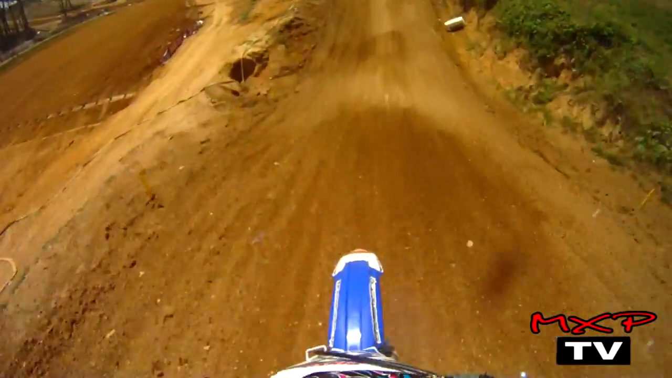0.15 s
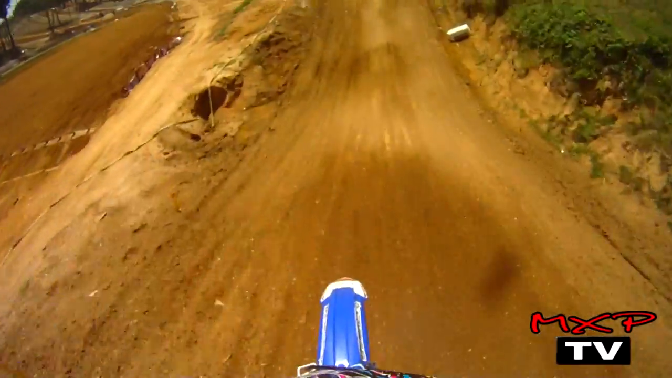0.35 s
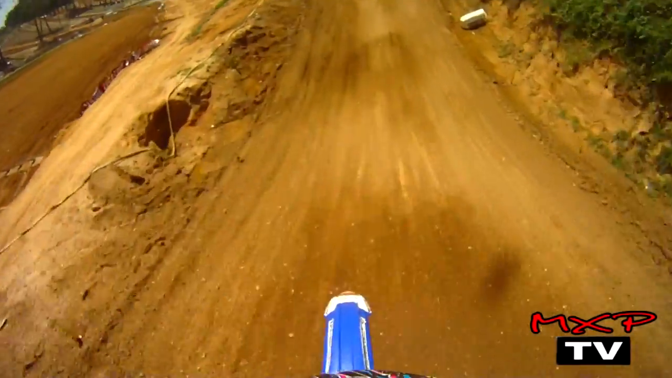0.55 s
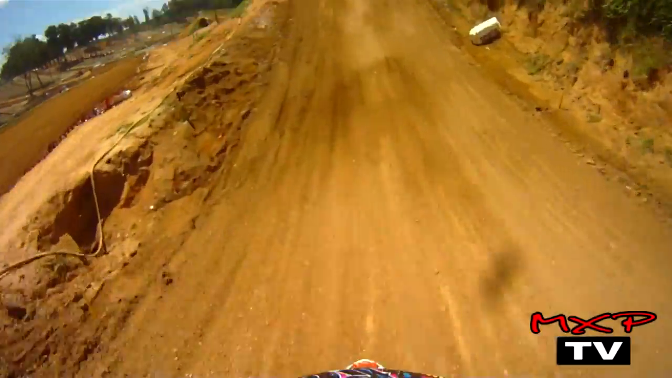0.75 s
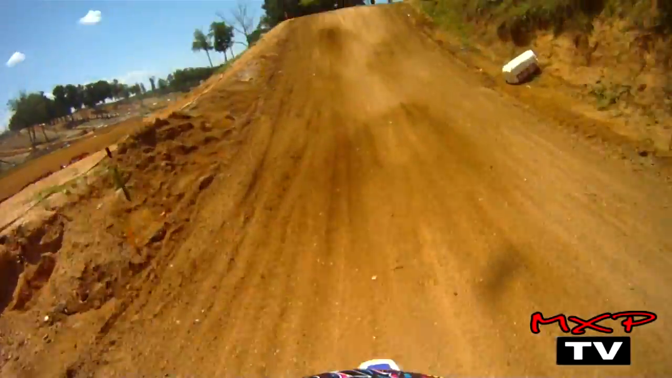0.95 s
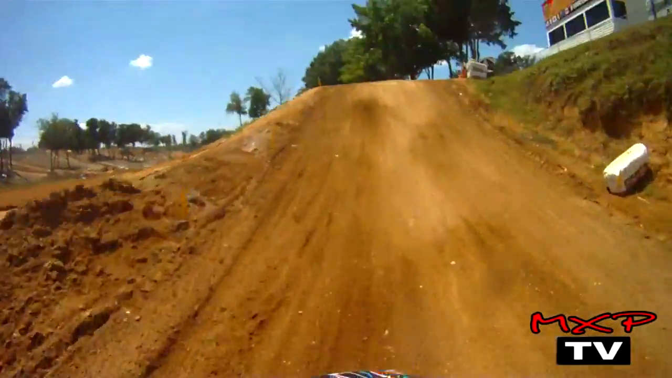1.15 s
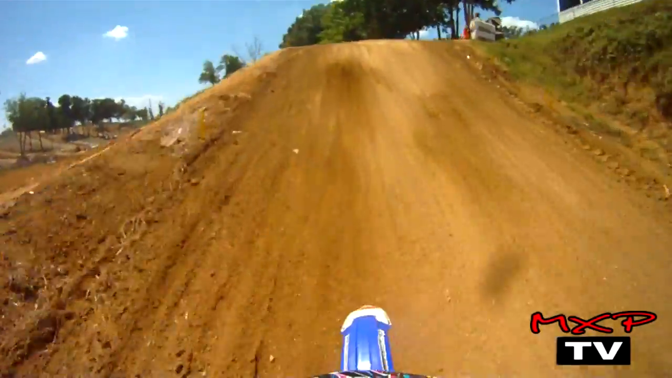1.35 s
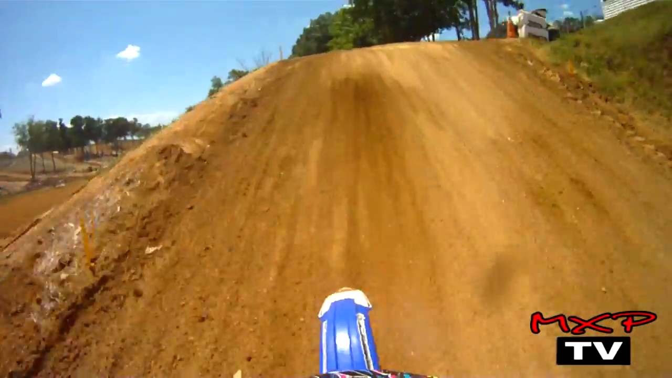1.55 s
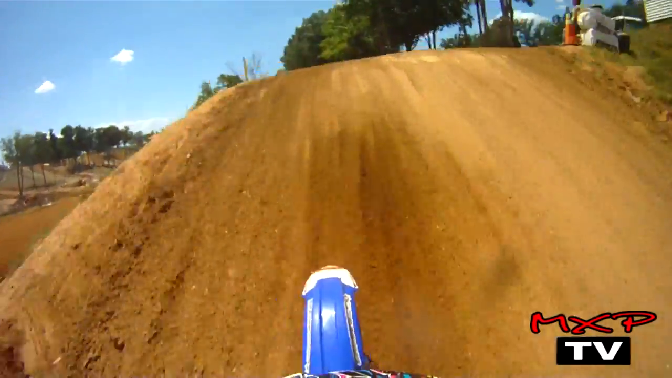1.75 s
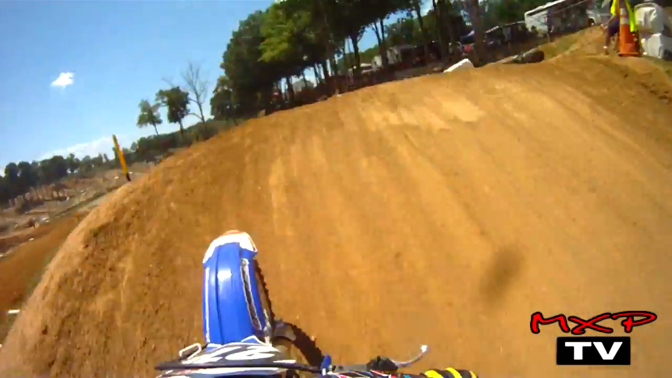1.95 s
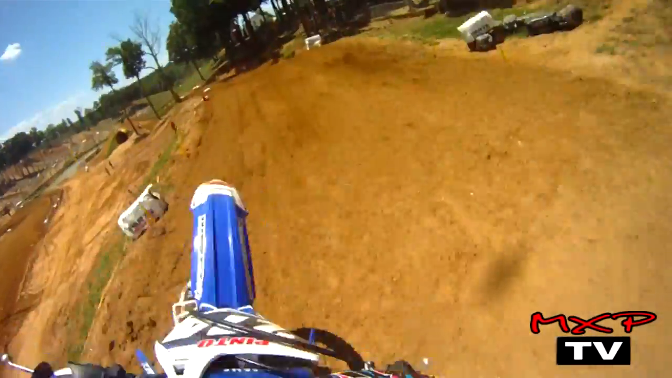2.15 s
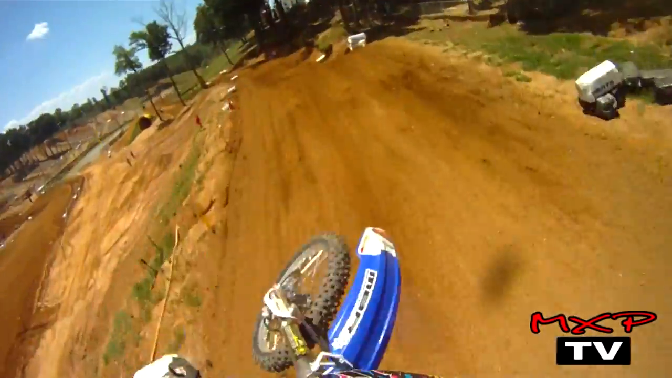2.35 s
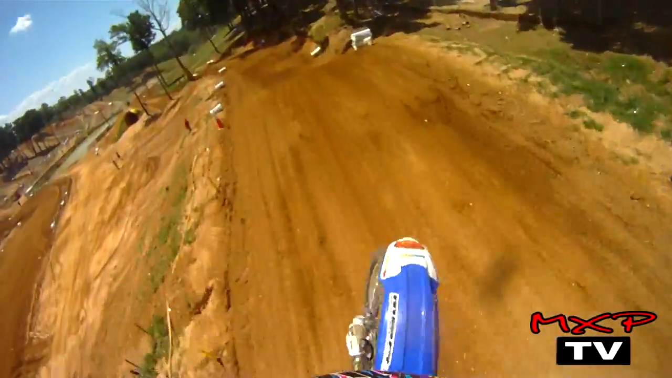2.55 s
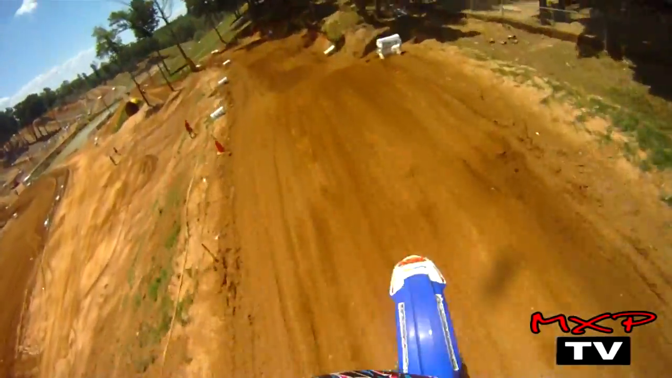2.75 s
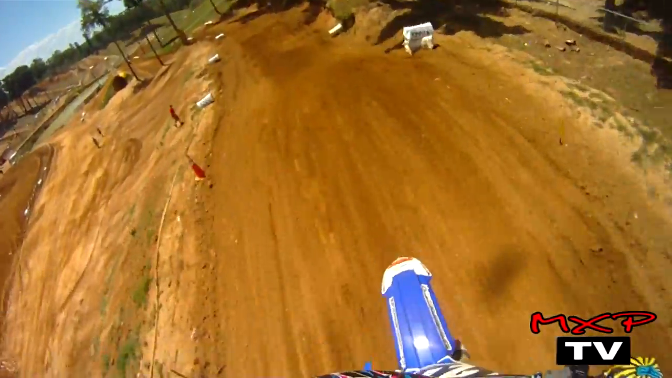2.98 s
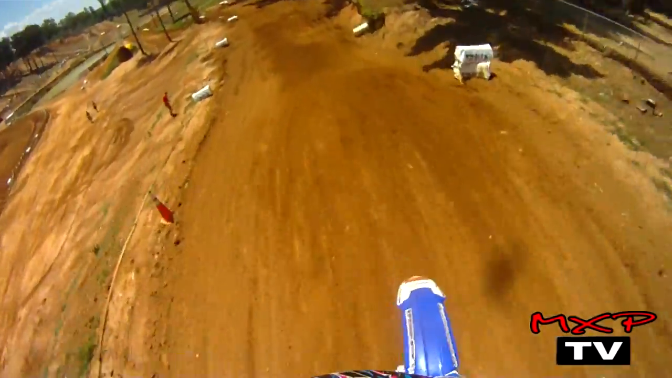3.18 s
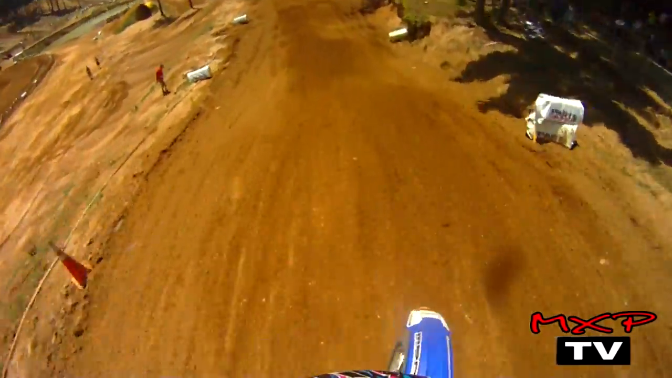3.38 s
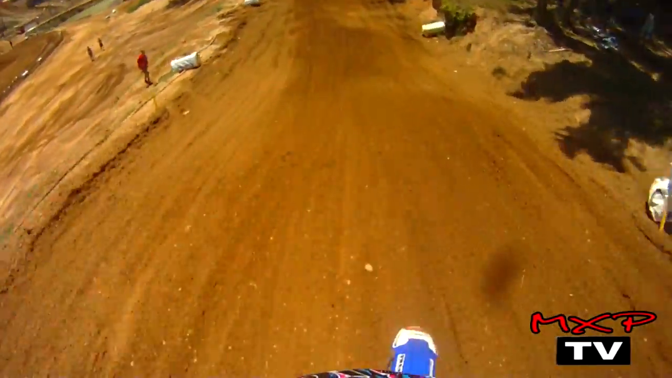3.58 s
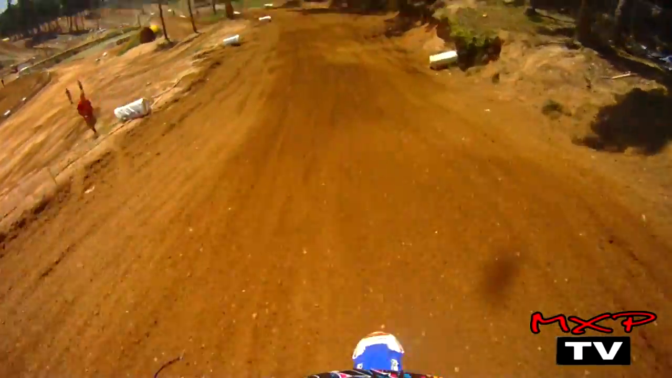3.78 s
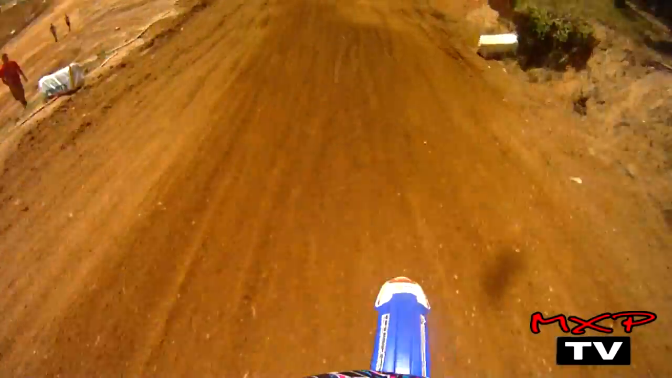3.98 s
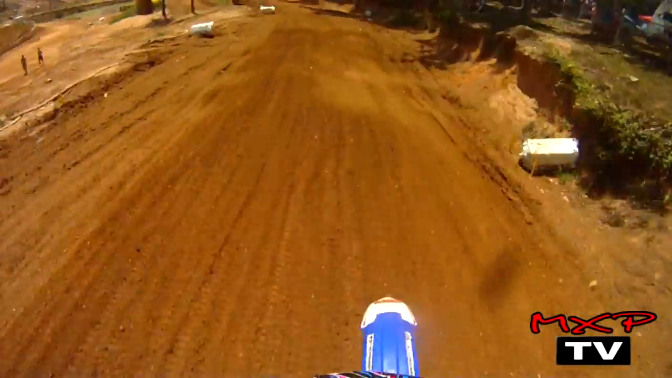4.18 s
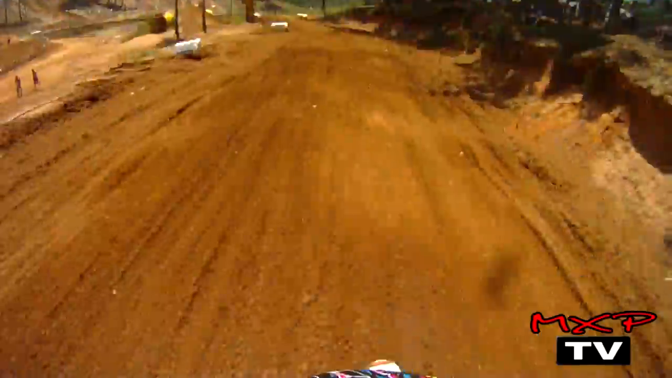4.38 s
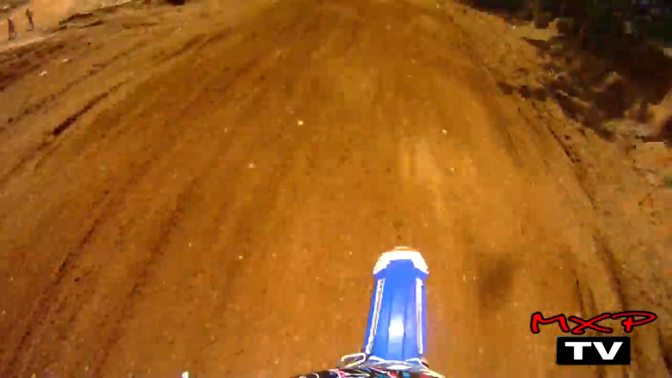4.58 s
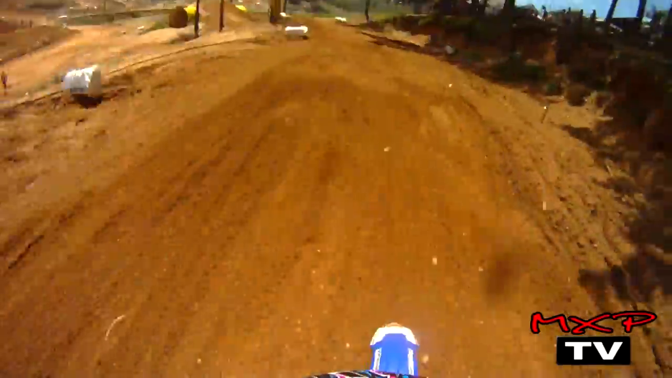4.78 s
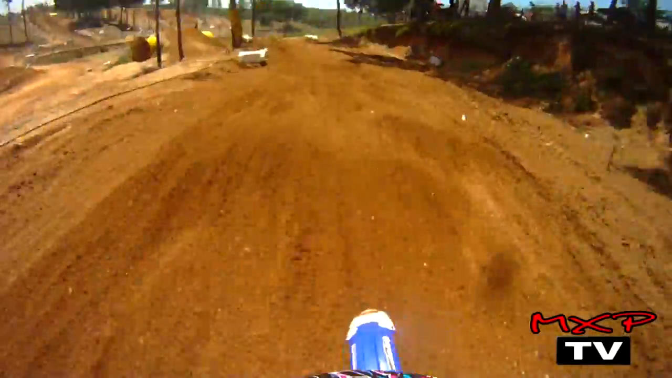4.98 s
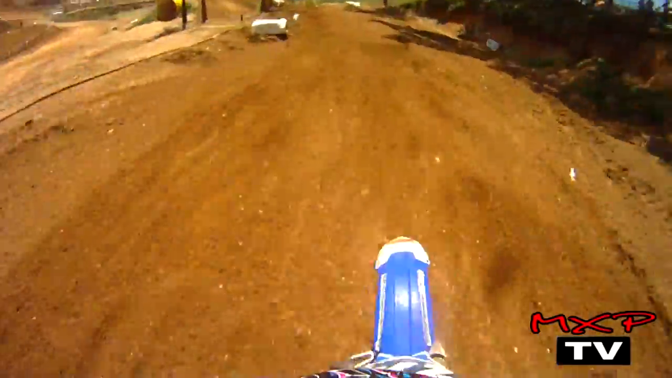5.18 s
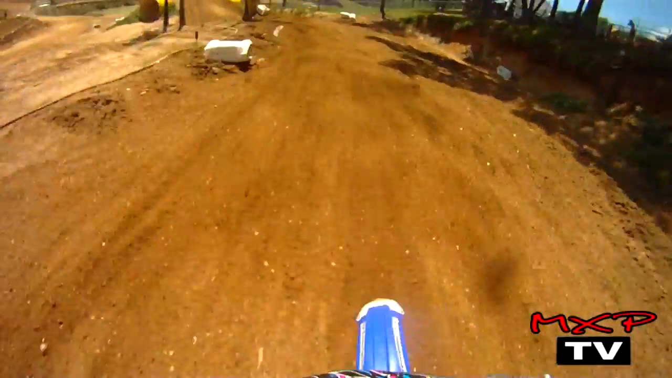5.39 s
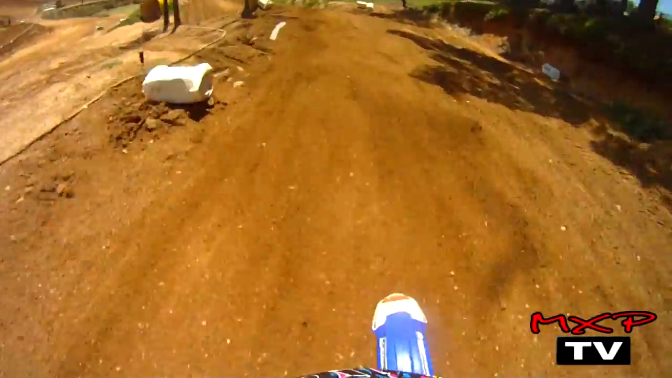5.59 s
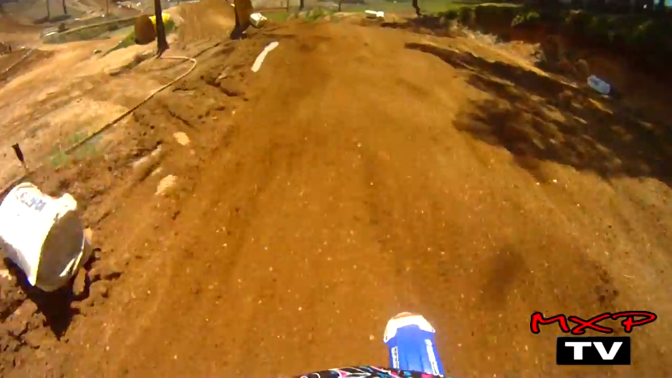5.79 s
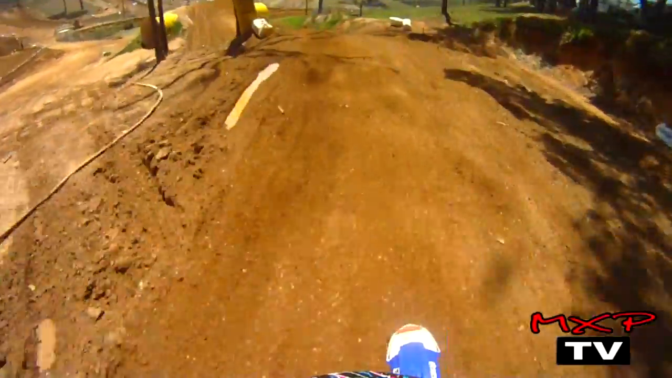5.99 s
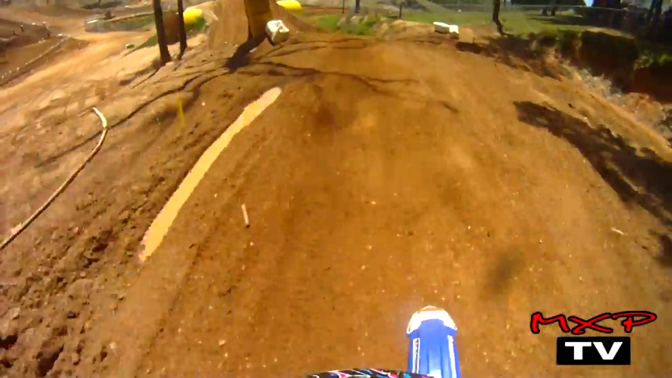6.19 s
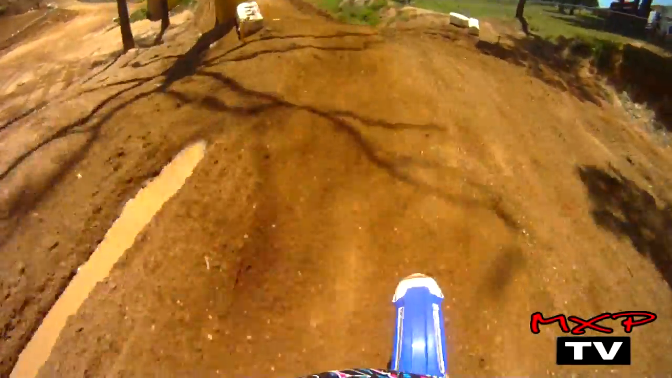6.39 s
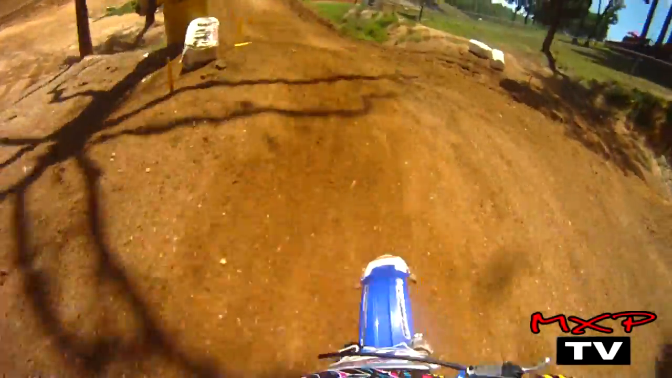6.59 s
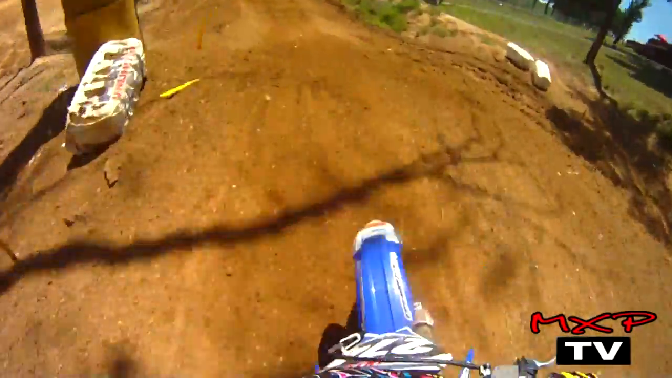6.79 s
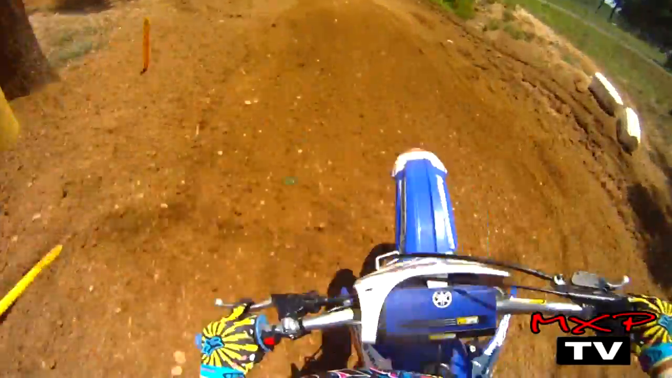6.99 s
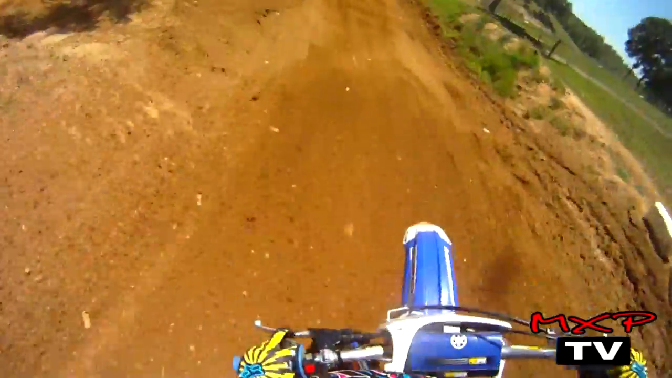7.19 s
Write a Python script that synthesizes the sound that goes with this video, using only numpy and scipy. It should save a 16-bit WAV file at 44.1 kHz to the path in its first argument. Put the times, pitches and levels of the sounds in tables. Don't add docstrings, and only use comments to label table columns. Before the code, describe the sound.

A two-stroke dirt bike is heard from the rider's helmet, close, mono, dry and gritty. It burbles quietly until 0.5 s, then leaps into a loud, metallic, ringing wail held to about 2.2 s, with low wind thumps near 1 s. A light touchdown knocks at 2.15 s; the throttle closes and the note sinks, softer and hollow, until 3.4 s. A rising burst ends in a heavy thud and clack at 3.8 s, the sound briefly ducking. The engine pulls hard again, wavering roughly to 4.6 s, when a sharp backfire cracks. Lower, uneven sputter follows, with a flare around 4.9 s and gusty rumbling. A second bang hits at 5.8 s, a quick rev flare follows, and the loudest, longest bang comes at 6.4 s, muffling everything momentarily. The engine then coasts, low and smoother, with small blips to the end at about 7 s.

```python
import sys
import numpy as np
from scipy import signal
from scipy.fft import rfft, irfft, next_fast_len
from scipy.io import wavfile
from scipy.ndimage import uniform_filter1d

SR = 44100
rng = np.random.default_rng(int(sys.argv[2]) if len(sys.argv) > 2 else 0)


def dump(signal):
    limited = np.clip(np.atleast_2d(signal).T, -1, 1)
    pcm = np.round(limited * 32767).astype(np.int16)
    wavfile.write(sys.argv[1], SR, pcm)


def voltage_ratio(decibels):
    exponent = np.asarray(decibels, float) / 20
    return 10 ** exponent


N = 319284
T = np.arange(N) / SR
FAST, RATE = T[::3], SR / 3
SLOW = T[::64]

# (frequency [Hz], width [Hz], level [dB])
BOX_ROCKING = [(31.1, 11.8, 16), (49.7, 43, -29)]
# (frequency [Hz], width [Hz], level [dB])
AIR_RUSH = [(73, 230, 12), (298, 1800, -25)]
# (time [s], half length [s], level [dB])
GUSTS = [(0.0, 0.11, -39), (.25, .15, -47), (0.892, .06, -27.5), (1.01, 0.076, -17.5), (1.384, .09, -32),
         (1.618, 0.16, -45), (1.8, .2, -45), (2.1, .3, -38), (2.457, .1, -36), (2.66, .06, -34),
         (2.822, 0.21, -39), (3.071, .12, -38), (3.34, 0.083, -33), (3.56, .13, -36), (3.831, .07, -19.5),
         (4.127, 0.11, -27), (4.44, 0.095, -27), (4.56, .15, -24), (4.69, .08, -24), (5.08, 0.15, -25),
         (5.259, 0.055, -21), (5.401, .2, -24.5), (5.867, .05, -29), (6.063, 0.16, -23),
         (6.271, 0.061, -35), (6.382, .12, -23), (6.444, 0.032, -35), (6.629, 0.065, -35),
         (6.79, 0.21, -23.5), (7.14, .1, -39)]
# (time [s], jolt [dB], shake level [dB], shake frequency [Hz], shake t60 [s])
LANDINGS = [
    (2.151, -20, -32, 60, 0.099),
    (3.818, -9.5, -7, 27.7, 0.27),
]
# (time [s], level [dB], frequency [Hz], t60 [s])
KNOCKS = [
    (2.147, -16.5, 904, 0.049),
    (3.866, -14.5, 991, 0.032),
]
# (time [s], peak [dB], ring frequency [Hz], t60 [s], sign of first push)
BACKFIRES = [
    (4.6398, 4.5, 2230, .022, 1),
    (5.811, 5, 2220, .026, -1),
    (6.4232, 7, 2600, .03, 1),
]
# (frequency [Hz], level [dB])
HOUSING = [(860, -14), (1180, -13.5), (2640, -12), (3600, -27)]
# (frequency [Hz], width [Hz], level on the throttle [dB], level coasting [dB])
RING = [(1965, 100, -9.5, -5), (2120, 60, -0.5, -6.5), (2275, 92, 3, 1), (2449, 56, -6.5, -0.5),
        (2639, 97, -6, -3)]
BOOM = [(190, 140, 0, 1), (359, 130, 0, 0)]
BARK = [(636, 43, -16.5, -5), (774, 108, -21.5, -12), (929, 102, -6.5, -4), (1138, 80, 2, 3),
        (1467, 70, -8, -5.5), (1614, 62, -9, -7)]
RASP = [(3107, 136, -1, -4.5), (3682, 253, -3.5, -2), (4810, 243, -9, -14), (5380, 274, -10, -14.5)]
PITCHED_SHARE = [.8, 1.2, .8, .72]
# (coasting level at MID_HZ [dB], slope with speed [dB/octave],
# rise at full throttle [dB], exponent of the throttle response, share of effort)
LAYERS = [
    (-32, 7, 15, 1.37, 0.17),
    (-44.5, 11, 15, 1.13, 0.59),
    (-33, 5.5, 6.5, 0.98, 1.27),
    (-34.5, 9.5, 10, 0.94, 0.75),
]
# (time [s], length [s], frequency [Hz], boost [dB])
SINGING_PANELS = [(1.27, .29, 2420, 7), (1.44, 0.16, 2160, 4), (1.74, 0.19, 2283, 10.5),
                  (1.613, 0.057, 5450, 14), (1.32, 0.31, 3140, 5), (1.03, 0.2, 720, 15.5),
                  (1.96, 0.17, 750, 10), (2.67, 0.13, 3720, 6), (4.17, 0.065, 3080, 6),
                  (4.5, 0.052, 3070, 2), (5.4, 0.17, 620, 7), (2.1, .14, 5370, 15.5),
                  (2.185, 0.032, 1150, 24), (3.33, .26, 3490, 8), (3.6, 0.064, 4400, 25),
                  (4.486, 0.07, 2291, 10), (7.3, 0.087, 1625, 8), (7.04, 0.16, 1657, 12),
                  (7.15, .12, 3680, 7), (3.8, 0.024, 2126, 12), (6.72, .08, 1150, 1), (4.44, .04, 1140, 13),
                  (4.3, 0.048, 488, 9), (1.06, 0.088, 385, 6), (0.59, 0.06, 520, 11),
                  (0.796, 0.065, 205, 5), (1.4, 0.24, 560, -9), (2.11, 0.12, 1500, 5.5),
                  (6.989, .058, 3500, 18)]
# (time [s], firing rate [Hz])
REVS = [(0.0, 80.5), (.505, 81), (.685, 206), (.97, 190), (2.06, 186.6), (2.27, 217.7), (2.78, 178.9),
        (3.46, 142.9), (3.73, 221.6), (3.83, 169.7), (4.33, 235.7), (4.39, 197.2), (4.57, 174.6),
        (4.8, 143.4), (5.33, 158), (5.7, 146.2), (6.1, 161.1), (7.24, 128.6)]
# (time [s], half length [s], change of speed [%])
WHEEL_SLIPS = [(.76, 0.043, -5), (.825, 0.037, 8), (.97, 0.042, -4.5), (1.05, 0.1, 4), (1.38, 0.076, -3),
               (1.49, 0.059, 3), (1.57, 0.042, -3), (1.62, 0.061, 3.5), (1.95, 0.091, 1.5),
               (2.13, 0.093, -4), (3.56, 0.048, -6), (3.64, 0.058, 5), (3.78, 0.034, -7.5),
               (3.96, 0.059, 2.5), (4.01, 0.043, -5), (4.15, 0.069, -6.5), (4.33, .04, 2), (4.51, 0.083, 4),
               (4.925, .09, 16), (5.148, .06, 4.5), (5.234, 0.065, -3.5), (5.328, 0.074, 5.5),
               (5.805, .05, 7), (5.945, 0.074, 26), (6.11, 0.083, 4), (6.33, 0.13, -5), (6.56, .14, 6.5),
               (6.84, 0.0807, -1.9), (6.98, 0.11, 3.5)]
# (time [s], rise [s], time of shutting [s], opening [0-1])
THROTTLE = [(-.1, 0.066, .5, .2), (.47, 0.14, 2.22, 1), (2.2, .05, 3.5, .21), (2.8, 0.19, 3.8, .33),
            (3.4, 0.056, 3.53, 0.43), (3.45, 0.053, 3.81, 0.93), (3.8, 0.013, 4.5, .85),
            (3.97, 0.13, 4.27, 1), (4.199, .05, 4.43, .72), (4.32, 0.074, 4.59, 1),
            (4.53, 0.038, 4.94, 0.5), (4.6, .05, 6.3, .3), (4.77, 0.061, 5.04, 0.58),
            (4.835, 0.029, 4.935, 1.01), (4.94, 0.025, 5.09, 0.48), (5.77, 0.034, 5.81, 0.82),
            (5.88, 0.053, 5.955, 0.67), (6.03, .07, 5.7, .4), (6.31, .022, 6.335, .9),
            (6.39, 0.033, 6.47, 0.34), (6.47, .012, 6.34, .85), (6.55, .05, 6.8, 0.14),
            (6.93, .03, 7.1, .25)]
# (time [s], half length [s], level [dB])
EFFORTS = [(.497, 0.023, 5.5), (.54, 0.032, 2), (.71, 0.017, -7.5), (.83, 0.063, 1.5), (.93, 0.066, 4.5),
           (1.44, 0.042, -4), (1.49, .05, 0.5), (1.57, 0.084, -1.5), (1.76, .08, -3), (1.95, 0.068, 0.5),
           (2.13, 0.12, 7), (3.4, .1, 1.5), (3.6, 0.041, 3.5), (3.73, 0.023, 4), (3.78, 0.038, 4),
           (3.95, 0.072, -4.5), (4.15, 0.05, 5), (4.39, .05, 2.5), (4.63, 0.059, 1.5), (4.918, .04, 1),
           (5.328, .07, 2.5), (5.8, 0.047, 3), (6.11, 0.062, 3), (6.32, 0.1, -2.5), (6.415, .03, 2),
           (6.764, .1, 1.5), (6.87, 0.091, -2)]
# (time [s], half length [s], change of evenness)
RUTS = [
    (3.45, 0.33, -0.22),
    (3.8, .1, -0.25),
    (4.4, 0.33, -0.14),
    (4.86, 0.17, -.25),
    (5.2, 0.22, -0.16),
    (5.7, 0.14, -0.13),
    (6.95, .5, 0.13),
]
# (time [s], dip [dB], hold [s], recovery [dB/s])
DUCKS = [
    (2.155, 5.5, 0.0045, 90),
    (3.824, 8, .01, 112),
    (4.6431, 15.5, 0.0049, 156),
    (5.815, 20, 0.0035, 249),
    (6.427, 16.5, 0.037, 900),
]

MID_HZ = 153.3


def evened(x, span=None):
    if span is None:
        power = np.mean(x ** 2)
    else:
        size = int(span * RATE)
        power = uniform_filter1d(uniform_filter1d(x ** 2, size), size)
    return x / np.sqrt(abs(power) + 1e-20)


def through(x, modes, steep=1.65):
    size = next_fast_len(len(x))
    hz = np.fft.rfftfreq(size, 1 / RATE)
    gain = sum(voltage_ratio(db) / (1 + ((hz - f) / w) ** 2) ** steep for f, w, db in modes)
    return irfft(rfft(x, size) * gain, size)[:len(x)]


def drift(rate_hz, count, t=FAST):
    steps_per_s = 200
    steps = rng.standard_normal((count, 1500))
    pole = np.exp(-2 * np.pi * rate_hz / steps_per_s)
    smooth = signal.lfilter([1], [1, -2 * pole, pole ** 2], steps)
    at = np.arange(1500) / steps_per_s
    return np.array([np.interp(t, at, evened(row)) for row in smooth])


def bumps(rows):
    return sum(high * np.cos(np.pi / 2 * np.clip((SLOW - s) / half, -1, 1)) ** 2 for s, half, high in rows)


def ringing(s, db, hz, t60):
    t = np.maximum(T - s, 0)
    return voltage_ratio(db - 60 * t / t60) * np.sin(2 * np.pi * hz * t)


def wind():
    calm_db, gust_fall_db, air_db = -51.5, 13, -44.5
    rocking = evened(through(rng.standard_normal(len(FAST)), BOX_ROCKING), 0.06)
    rush = evened(through(rng.standard_normal(len(FAST)), AIR_RUSH))
    rush = rush * voltage_ratio(2.5 * drift(3.9, count=1)[0])
    gusts = voltage_ratio(calm_db)
    for s, half, db in GUSTS:
        gusts = gusts + voltage_ratio(db - gust_fall_db * abs((SLOW - s) / half) ** 1.32)
    return np.interp(FAST, SLOW, gusts) * rocking + voltage_ratio(air_db) * rush


def landings():
    jolt_s = 0.0027
    out = sum(ringing(*knock) for knock in KNOCKS)
    for s, jolt_db, *shake in LANDINGS:
        jolt = voltage_ratio(jolt_db) * np.exp(-((T - s) / jolt_s) ** 2)
        out = out + ringing(s, *shake) - jolt
    return out


def backfires():
    out = np.zeros(N)
    for s, db, hz, t60, sign in BACKFIRES:
        t = np.maximum(T - s, 0)
        fade = voltage_ratio(db - 60 * t / t60) * (T > s)
        cycles = hz * (t - 0.000302 * (1 - np.exp(-t / 0.00115)))
        push = np.sign(sign) * np.sin(2 * np.pi * cycles)
        crack = voltage_ratio(-21) * uniform_filter1d(rng.standard_normal(N), size=6)
        out += fade * (push + crack)
        for f, down_db in HOUSING:
            out += ringing(s + 0.00149, db + down_db, f, 1.305 * t60)
    return out


def controls():
    hz = np.interp(SLOW, *np.transpose(REVS)) * (1 + bumps(WHEEL_SLIPS) / 100)
    shut_s = 0.064
    openings = []
    for s, rise, shut, wide in THROTTLE:
        opens, closes = wide * (SLOW - s) / rise, wide - (SLOW - shut) / shut_s
        openings.append(np.clip(np.minimum(opens, closes), 0, wide))
    opening = np.max(openings, 0)
    octaves = np.log2(hz / MID_HZ) * (1 - 0.55 * opening)
    effort_db = bumps(EFFORTS)
    levels_db = [db + per * octaves + full * opening ** lag + share * effort_db
                 for db, per, full, lag, share in LAYERS]
    stumble = 0.8 * np.minimum(np.log2(hz / 117), 0)
    even = 0.64 + 0.21 * opening + 0.0063 * effort_db + bumps(RUTS) + stumble
    curves = (hz, np.clip(even, 0, 1), *levels_db)
    hz, even, *levels_db = (np.interp(FAST, SLOW, c) for c in curves)
    return hz, levels_db, even


def orders(t, hz, turns, load):
    order = np.arange(1, 41)[:, None]
    unrest = np.minimum(order / 3.4, 1)
    swell_db = (4.5 - 1.5 * load) * unrest * drift(7, count=40, t=t)
    for at, length, panel_hz, boost_db in SINGING_PANELS:
        near = abs(t - at) < 2 * length
        off = ((t[near] - at) / length) ** 2 + ((order * hz[near] - panel_hz) / 90) ** 2
        swell_db[:, near] += boost_db * np.exp(-off)
    start = rng.uniform(0, 2 * np.pi, order.shape)
    sway = drift(12.2, count=40, t=t)
    wander = start + (0.7 - 0.21 * load) * unrest * sway
    wander = wander + (0.11 - 0.039 * load) * order * sway[0]
    audible = order * hz < 5900
    return np.sum(voltage_ratio(swell_db) * np.cos(2 * np.pi * order * turns + wander) * audible, 0)


def loaded(x, modes, load, steep):
    pulling = through(x, [(f, w, db) for f, w, db, _ in modes], steep)
    coasting = through(x, [(f, w, db) for f, w, _, db in modes], steep)
    return load * pulling + (1 - load) * coasting


def engine():
    hz, levels_db, even = controls()
    load = np.clip((levels_db[0] + 28.0) / 13.4, 0, 1)
    turns = np.cumsum(hz) / RATE
    tone = orders(FAST, hz, turns, load)
    strength = voltage_ratio(1.85 * rng.standard_normal(2000))[turns.astype(int)]
    puffs = strength * (2.7 + np.exp(-(turns % 1) / 0.73)) * rng.standard_normal(len(FAST))
    out = np.zeros(len(FAST))
    for modes, db, tonal in zip((RING, BOOM, BARK, RASP), levels_db, PITCHED_SHARE):
        share = np.clip(tonal * even / 0.79, 0, 1)
        pitched = evened(loaded(tone, modes, load, steep=1.47), 0.058)
        noisy = evened(loaded(puffs, modes, load, steep=0.78), 0.056)
        out += voltage_ratio(db) * (np.sqrt(share) * pitched + np.sqrt(1 - share) * noisy)
    return out


def scene():
    steady = signal.resample_poly(wind() + engine(), 3, 1)[:N]
    return (steady + landings() + backfires())[None]


def roll_off(x):
    return signal.sosfilt(signal.butter(12, 15720, fs=SR, output="sos"), x)


def record(dry):
    fall_s, clip, edge_hz = 0.003, 0.76, 16000
    dip_db = np.zeros(N)
    for s, db, hold, recovery in DUCKS:
        onset = np.clip((T - s) / fall_s, 0, 1)
        dip_db += onset * np.clip(db - recovery * (T - s - hold), 0, db)
    slow = signal.resample_poly(dry / voltage_ratio(dip_db), 40, 147, axis=1)
    held = np.repeat(np.clip(slow, -clip, clip), 4, axis=1)
    mix = signal.resample_poly(held, 147, 160, axis=1)[:, :N]
    lowpass = signal.firwin(255, edge_hz, window=("kaiser", 9), fs=SR)
    mix = signal.oaconvolve(mix, lowpass[None], "same")
    return roll_off(mix)


dry = scene()
out = record(dry)
dump(out)
```